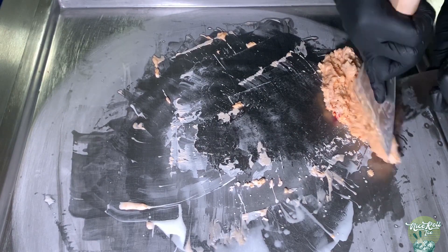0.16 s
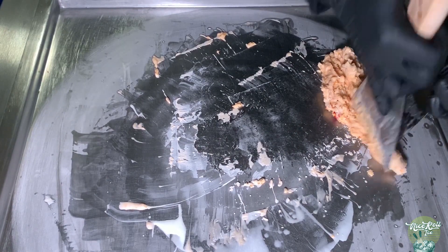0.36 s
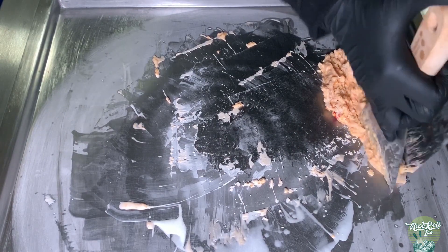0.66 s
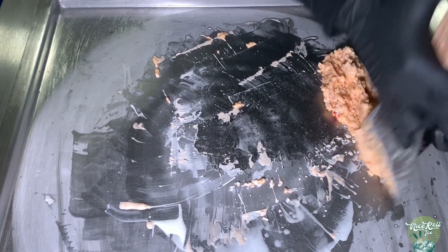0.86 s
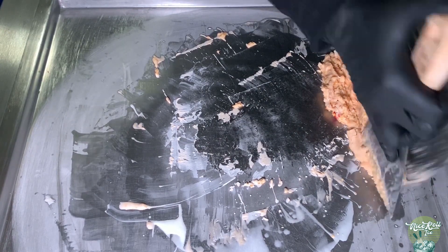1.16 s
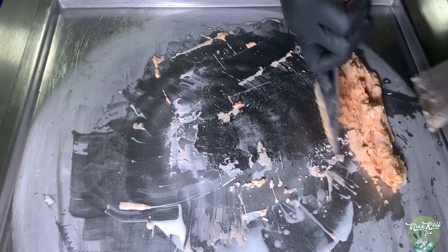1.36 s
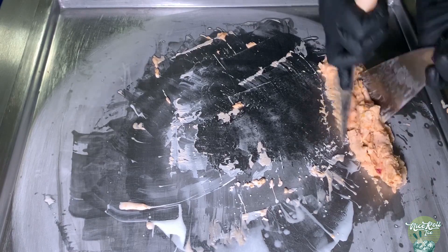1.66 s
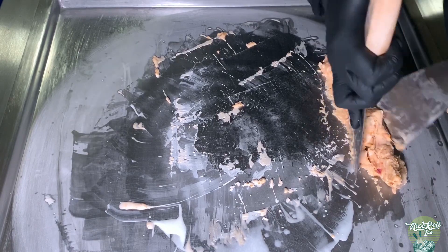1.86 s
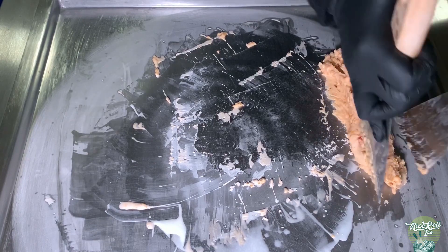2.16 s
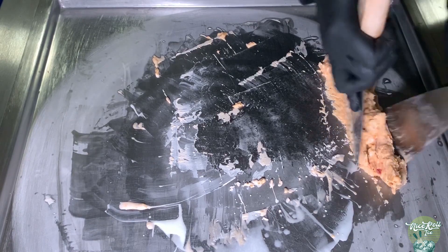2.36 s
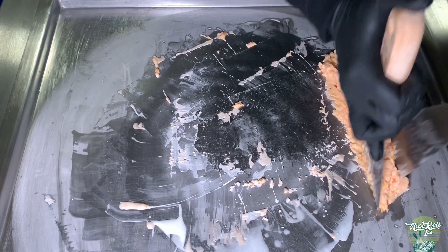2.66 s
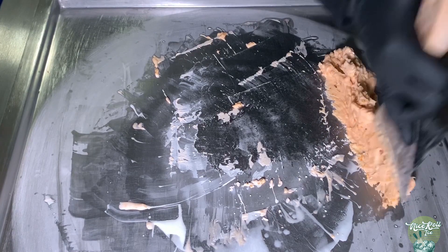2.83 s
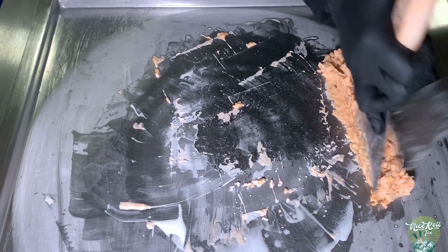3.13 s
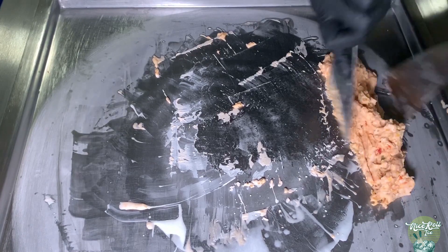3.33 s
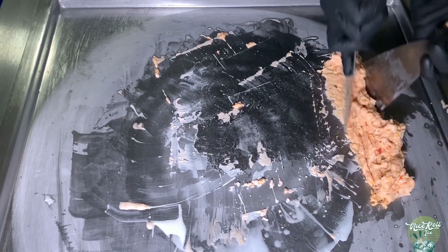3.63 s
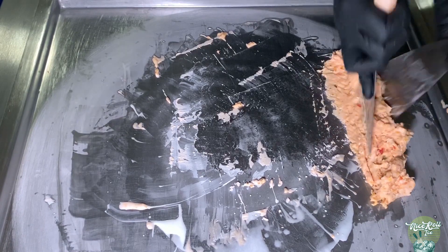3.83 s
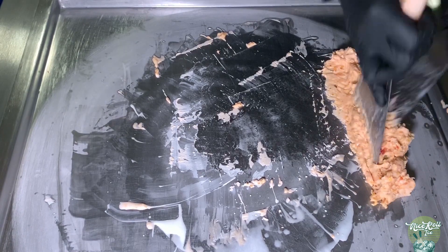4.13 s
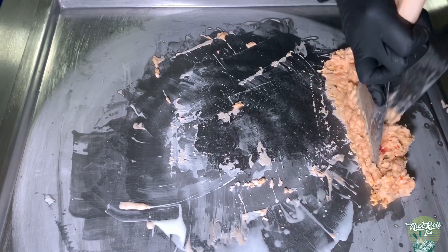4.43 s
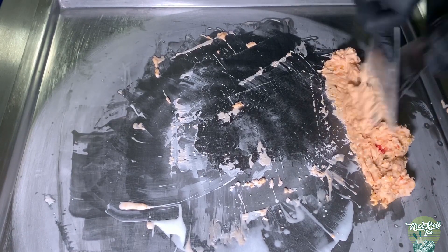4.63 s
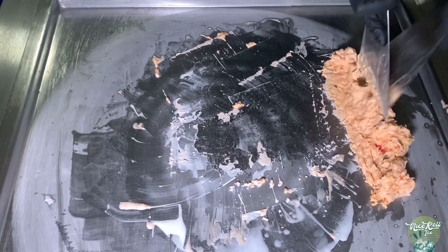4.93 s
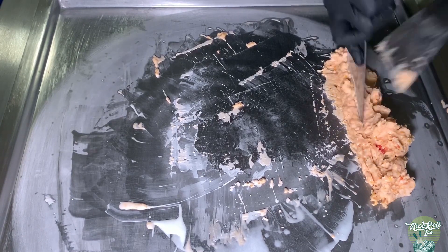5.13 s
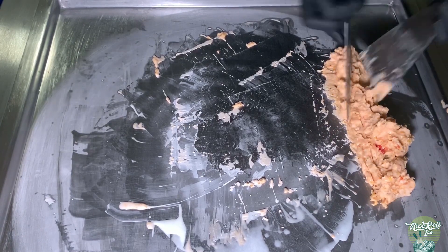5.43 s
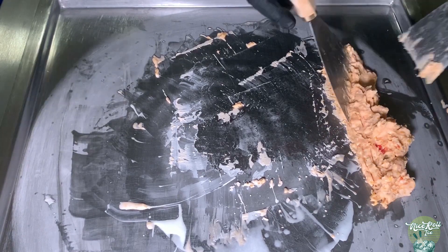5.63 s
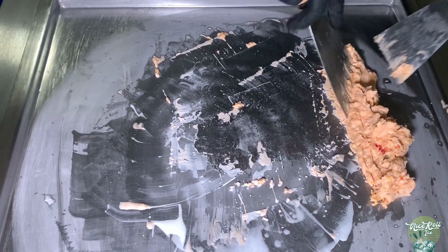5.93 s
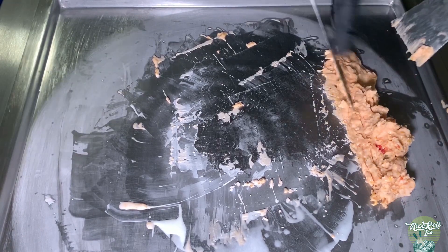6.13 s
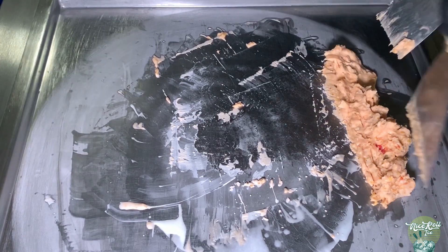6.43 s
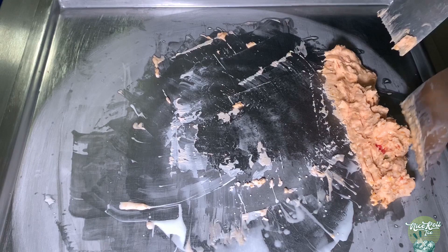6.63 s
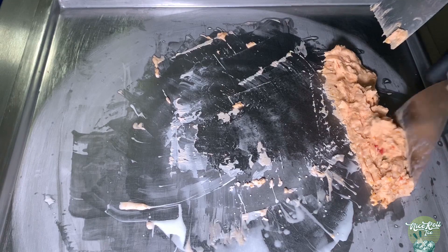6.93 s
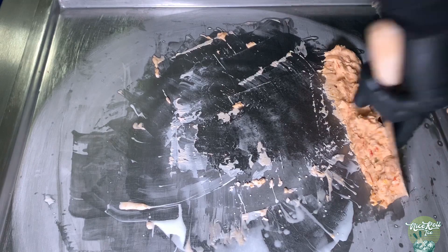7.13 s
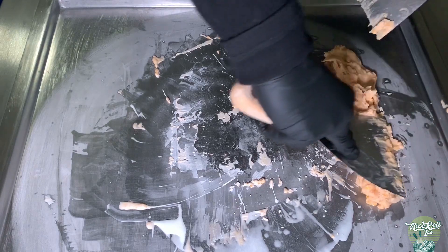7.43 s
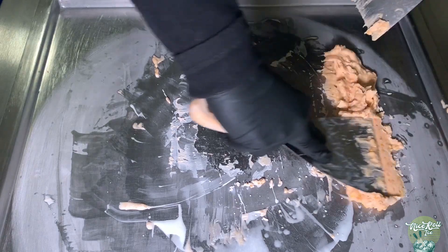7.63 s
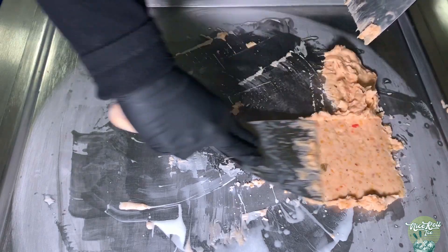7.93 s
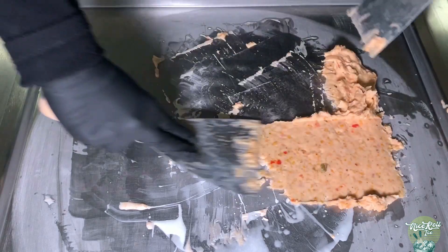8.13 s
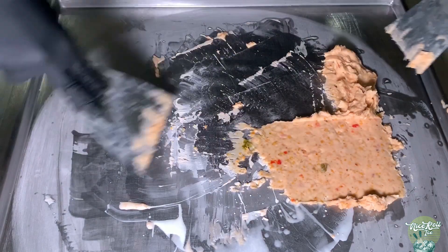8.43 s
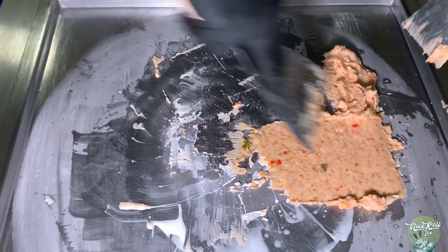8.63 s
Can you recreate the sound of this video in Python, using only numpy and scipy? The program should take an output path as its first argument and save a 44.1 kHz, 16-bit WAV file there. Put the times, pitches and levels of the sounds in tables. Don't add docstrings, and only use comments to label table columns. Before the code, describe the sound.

Two steel spatulas chop hard and clatter on a chilled metal plate, with gritty scrapes and squeaks over a steady low compressor hum.

```python
import sys
import numpy as np
from scipy import signal
from scipy.fft import rfft, irfft
from scipy.io import wavfile
from scipy.ndimage import uniform_filter1d

SR = 44100
rng = np.random.default_rng(int(sys.argv[2]) if len(sys.argv) > 2 else 0)


def dump(signal):
    limited = np.clip(np.atleast_2d(signal).T, -1, 1)
    pcm = np.round(limited * 32767).astype(np.int16)
    wavfile.write(sys.argv[1], SR, pcm)


def decibels_to_gain(level_db):
    exponent = np.asarray(level_db, float) / 20
    return 10 ** exponent


N = 387198

# f/Hz, width/Hz, level/dB
PLATE = [(387, 100, -37.5), (610, 38.5, 7), (706.5, 85, 2.5), (916, 29, 3.5), (1023, 33, 1.5),
         (1157, 26, -23)]
BLADE = [(1400, 660, -58), (1520, 17, -5.5), (1878, 160, 4.5), (2120, 386, 7.5), (2400, 330, 1),
         (2682, 63, 5.5), (3136, 34, -3), (3840, 220, -17.5)]
EDGE = [(5060, 1100, -3.5), (6320, 450, 7), (8310, 960, 10), (10000, 3800, 7), (11200, 760, -10),
        (11560, 400, -3), (14000, 5700, -0.5)]


def rms_one(x):
    return x / np.sqrt(np.mean(x ** 2) + 1e-20)


def at_hz(points, hz):
    f, value = np.array(points)[:, :2].T
    return np.interp(np.log(hz + 1e-9), np.log(f), value)


def drift(rate):
    step = 40
    r = np.exp(-2 * np.pi * step * rate / SR)
    coarse = rng.standard_normal(N // step + 4002)
    slow = signal.lfilter([1], [1, -2 * r, r * r], coarse)[4000:]
    return np.interp(np.arange(N) / step, np.arange(len(slow)), rms_one(slow))


def hum():
    # shaft order, mains order, level/dB rms, wobble/dB, left-right/dB, right lead/rad
    compressor = [(1, 0, -36, .8, .4, 0), (2, 0, -41.5, 1.5, -2, .35), (0, 2, -29, .6, -2.3, .35),
                  (3, 0, -42.5, 3, -1, .35), (1, 2, -43.5, 2, -1, .35), (5, 0, -47.5, 3, -.4, .3),
                  (1, 4, -47.5, 2, -.4, .3), (6, 0, -49.5, 4, 0, .3), (8, 0, -53.5, 3, 0, .3)]
    # f/Hz, level/dB rms
    blade_tones = [(112.45, -46), (224.9, -45.5)]
    shaft_hz, mains_hz = 49.172, 50
    t = np.arange(N) / SR - 0.14
    out = np.zeros((2, N))
    wobble = [drift(2.37) for k in range(4)]
    for k, (shaft, mains, level_db, wobble_db, pan_db, lead) in enumerate(compressor):
        phase = 2 * np.pi * (shaft * shaft_hz + mains * mains_hz) * t + [[0], [lead]]
        pan = decibels_to_gain(np.array([[pan_db / 2], [-pan_db / 2]]))
        out += decibels_to_gain(level_db + wobble_db * wobble[k % 4]) * np.sin(phase) * pan
    for hz, level_db in blade_tones:
        out += decibels_to_gain(level_db + 1.5 * wobble[0]) * np.sin(2 * np.pi * hz * t)
    return np.sqrt(2) * out


def airflow():
    # f/Hz, level/dB per Hz
    casing = [(30, -87), (60, -64), (85, -69), (115, -58.5), (137, -50.5), (190, -63), (290, -66.5),
              (420, -66.5), (480, -73.5), (610, -66), (760, -76), (890, -69.5), (1100, -75)]
    ducts = [(1100, -75), (2000, -80), (3500, -87.5), (5000, -91.5), (7400, -96), (8500, -93),
             (10500, -102.5), (12000, -90), (13200, -102), (15500, -104)]
    hz = np.fft.rfftfreq(N, 1 / SR)
    meet_hz = casing[-1][0]
    low, high = rfft(rng.standard_normal((2, 2, N))) * np.sqrt(SR / 2)
    rumble = irfft(low * decibels_to_gain(at_hz(casing, hz)) * (hz < meet_hz) * (hz > 20), N)
    hiss = irfft(high * decibels_to_gain(at_hz(ducts, hz)) * (hz >= meet_hz), N)
    return rumble * decibels_to_gain(1.2 * drift(3)) + hiss * decibels_to_gain(0.4 * drift(4))


def grit(spread_db):
    white = rng.standard_normal((2, N))
    sizes = decibels_to_gain(spread_db * np.minimum(rng.exponential(1, N), 4))
    streams = np.array([np.roll(white, k * 5000, axis=1) for k in range(3)])
    return rms_one(streams * sizes)


def body(force, modes, broad_db, strengths_db, damping):
    low, high = modes[0][0] * 0.61, modes[-1][0] * 0.95
    band = signal.butter(2, [low, high], "band", fs=SR, output="sos")
    out = decibels_to_gain(broad_db) * signal.sosfilt(band, force)
    power = decibels_to_gain(2 * broad_db) * 2 * (high - low) / SR
    for k, (hz, width, level_db) in enumerate(modes):
        r = np.exp(-np.pi * width * damping / SR)
        poles = [1, -2 * r * np.cos(2 * np.pi * hz / SR), r * r]
        struck = force * decibels_to_gain(level_db + strengths_db[k])
        out += (-1) ** k * (1 - r * r) / 2 * signal.lfilter([1, 0, -1], poles, struck)
        power += decibels_to_gain(2 * level_db) * np.pi * width * damping / SR
    return out / np.sqrt(power)


def all_blows():
    chops = [(0.3414, -25.5, 8, -9, 1750), (0.4395, -19, -5.5, -11, 2120), (0.5266, -15.5, 3, -13, 2550),
             (0.5719, -7.5, -4, -10, 2120), (0.7101, -10, -4, -11.5, 2120),
             (0.8777, -18.5, 4.5, -11.5, 1810), (0.9429, -5, -7, -14, 2770),
             (1.0404, -6.5, -1.5, -12.5, 2400), (1.1625, -24.5, -2.5, -14, 2630),
             (1.4948, -11.5, -2.5, -31, 2720), (1.502, -8.5, -16, -11, 1730),
             (2.4106, -14.5, 4, -13.5, 1940), (2.729, -21, -2, -14, 2430), (3.4146, -11.5, -6, -17, 2830),
             (3.4401, -7, -12, -8, 3130)]
    cuts = [
        (4.0684, -12.5, 0, -16, 1730),
        (4.7682, -6, -2, -7, 1680),
        (5.023, -9.5, 0, -13, 2480),
        (5.3836, -15, 2.5, -10, 2540),
    ]
    catches = [(1.674, -27.5, 6.5, -1.5, 1820), (2.078, -38.5, -6, -10, 1310),
               (2.4582, -25.5, -18, -4, 1670), (2.4965, -22.5, 2.5, -7, 2100), (2.517, -27, -2, -12, 1750),
               (3.4513, -13.5, -16, -9, 1850), (3.5125, -43, -13, -9, 1880), (3.5354, -36, -8, 1, 1890),
               (3.646, -29.5, 1, -12, 1560), (4.44, -43, 1.5, -16, 1900), (4.603, -37, 2.5, -15, 1890),
               (8.1782, -29, -28, -7, 3350), (8.1875, -24.5, -25, -13, 2120), (8.219, -36, -29, 11, 2180),
               (8.254, -19.5, -29, -5, 2260), (8.2802, -17, -31, -0.5, 3300)]
    # t/s, blade peak/dB, edge tick/dB re peak
    edge_ticks = [(0.834, -43, 5), (0.8596, -36, 4), (2.8826, -36.5, 9), (2.891, -33, 12),
                  (3.031, -49.5, 10), (3.071, -47, 5), (3.0998, -30.5, 9.5), (3.114, -35.5, 12),
                  (5.5444, -44, 16.5), (8.11, -58, 9), (8.347, -44, 8), (8.426, -52, 10)]
    ticks = [(s, peak_db, -10, tick_db, 4200) for s, peak_db, tick_db in edge_ticks]
    # plate, blade, edge ring/dB re peak, prominence of loudest pitch/dB, edge brightening/dB per mode
    kinds = [(chops, (-6, -2, -0.5, 5.5, 0)),
             (cuts, (-8, -2, -2, 6.5, -0.5)),
             (catches, (-17, -33, -10, 7.5, 0)),
             (ticks, (-5, -4.5, -2, 10, 1.5))]
    return [(*row, *traits) for rows, traits in kinds for row in rows]


def blows():
    contact_s = [0.0076, 0.006, 0.0031]
    ring_t60_s = [0.33, 0.2, 0.091]
    knock, ring, rough = np.zeros((2, N)), np.zeros((3, N)), grit(3.5)
    early, t = SR // 50, np.arange(SR // 2) / SR
    near = np.arange(-early, 3 * early) / SR
    after = np.maximum(near, 0)

    approach = decibels_to_gain([[-26], [-23], [-30]]) * np.exp(near / 0.005) * (near < 0)
    rise = 1 - np.exp(-after / np.array([[0.0015], [0.0004], [0.0002]]))
    crack = 1 + 1.3 * np.exp(-after / 0.0015)
    rattle = np.exp(-(after / np.array(contact_s)[:, None]) ** 2)
    shape = approach + rise * crack * rattle
    decay_db = -60 * t / np.array(ring_t60_s)[:, None]
    onset = 1 - np.exp(-t / 0.0011)

    events = all_blows()
    luck = 1.8 * rng.standard_normal((len(events), 3, 9))
    for (s, peak_db, thud_db, tick_db, hz, *ring_db, pitch_db, bright_db), spot in zip(events, luck):
        i = round(s * SR)
        span = slice(i - early, i + 3 * early)
        level = decibels_to_gain(peak_db + np.array([[thud_db - 3.5], [-6], [tick_db - 3]]))
        sizes = np.sqrt(np.mean((level * shape) ** 2, axis=1))
        force = shape[:, None] * rough[:, :, span] + 1e-18
        blade = BLADE[:1] + [(hz, 150, pitch_db)] + BLADE[1:]
        strengths = spot + bright_db * np.outer([0, 0, 1], np.arange(9))
        for k, (modes, damping) in enumerate([(PLATE, 2.5), (blade, 2.2), (EDGE, 1.2)]):
            knock[:, span] += sizes[k] * rms_one(body(force[k], modes, -7.5, strengths[k], damping))
        tail = decibels_to_gain(np.array(ring_db)[:, None] + decay_db) * onset
        ring[:, i:i + len(t)] += (level * tail)[:, :N - i]
    return knock, ring


def thumps():
    # t/s, peak level/dB, f/Hz, t60/s
    bends = [(0.526, -27, 143, 0.098), (0.573, -14.5, 131, 0.31), (0.708, -16, 132, 0.11),
             (0.879, -17, 145, 0.048), (0.941, -20, 239, 0.1), (1.041, -15.5, 133, 0.34),
             (1.163, -26, 121, 0.065), (1.506, -10, 133, 0.083), (2.411, -20, 122, 0.091),
             (2.727, -25, 145, 0.17), (3.417, -14.5, 122, 0.054), (3.441, -12.5, 141, 0.056),
             (4.069, -23, 121, 0.08), (4.768, -3, 371, 0.039), (4.769, -13, 253, 0.11),
             (5.022, -24, 124, 0.2), (5.024, -14, 306, 0.039), (5.383, -14, 125, 0.082)]
    out, t = np.zeros(N), np.arange(SR // 4) / SR
    for s, peak_db, hz, t60 in bends:
        i = round(s * SR)
        swing = (1 - np.exp(-t / 0.0016)) * np.sin(2 * np.pi * hz * t)
        out[i:i + len(t)] += decibels_to_gain(peak_db - 60 * t / t60) * swing
    return out


def squeaks():
    # t/s, length/s, f/Hz, width/Hz, level/dB
    slips = [(0.57, .03, 8000, 200, -38), (1.489, 0.038, 2690, 90, -21), (1.51, 0.022, 8540, 150, -28),
             (1.533, 0.13, 683, 60, -26.5), (1.541, 0.056, 2640, 80, -29.5),
             (1.623, 0.075, 1650, 120, -34.5), (2.495, 0.063, 1702, 570, -30),
             (2.509, .065, 1018, 160, -28.5), (2.533, 0.072, 617, 90, -35), (3.44, 0.03, 8100, 150, -32),
             (3.499, 0.13, 1894, 60, -44), (3.51, 0.016, 8620, 160, -33.5), (3.529, .065, 890, 45, -29.5),
             (3.55, .034, 2620, 200, -38), (3.577, 0.048, 893, 40, -36), (3.632, 0.042, 1496, 470, -29),
             (8.176, .165, 2180, 120, -34), (8.175, 0.16, 3320, 110, -43), (8.25, 0.16, 1450, 230, -40),
             (8.297, .1, 2040, 130, -45), (8.355, .045, 1422, 60, -29.5)]
    out = np.zeros((2, N))
    for s, length, hz, width, level_db in slips:
        n, i = round(length * SR), round(s * SR)
        chance = rng.standard_normal((2, 2, 10000))
        wander = chance[0] + 1j * chance[1]
        for pole_width in width, 2 * width:
            wander = signal.lfilter([1], [1, -np.exp(-np.pi * pole_width / SR)], wander)
        wander = wander[:, -n:]
        wander = wander / np.sqrt(np.mean(abs(wander) ** 2))
        tone = (0.66 + wander) * np.exp(2j * np.pi * hz * np.arange(n) / SR)
        out[:, i:i + n] += decibels_to_gain(level_db) * signal.windows.tukey(n, 0.45) * tone.real
    return out * decibels_to_gain(1.5 * drift(80))


def strokes():
    drags = [(1.508, 0.32, -21, -23, -28), (1.635, 0.21, -27, -39, -60), (2.496, 0.16, -27, -25.5, -32),
             (2.917, 0.16, -50, -60, -43), (3.117, 0.11, -44, -48, -43), (3.452, 0.051, -36, -56, -29),
             (3.651, 0.15, -24, -32, -43), (4.595, .05, -33, -44, -42), (5.564, 0.21, -56, -58, -45),
             (6.94, 0.066, -62, -44, -36), (8.293, 0.21, -53, -28, -33.5)]
    sweeps = [(0.773, 0.13, -48, -50, -39.5), (0.896, 0.083, -43, -37.5, -29.5),
              (1.092, 0.086, -60, -38, -28.5), (2.05, 0.063, -45, -54, -49.5), (2.395, 0.11, -35, -33, -47),
              (3.52, 0.082, -36, -43, -45), (3.589, 0.1, -30, -40, -46.5), (4.4, .07, -54, -49, -49),
              (5.605, 0.41, -65, -62, -49.5), (6.887, 0.088, -61, -54, -50), (8.084, 0.057, -62, -55, -54),
              (8.166, 0.17, -60, -30, -38), (8.313, 0.14, -38.5, -38.5, -38.5)]
    bite_s, ease_db, swell_share = 0.0032, 31, 0.85
    out = np.zeros((3, N))
    for rows in drags, sweeps:
        for s, length, *levels_db in rows:
            i, t = round(s * SR), np.arange(round(length * SR)) / SR
            if rows is drags:
                bite = np.clip(np.minimum(t, length - t) / bite_s, 0, 1)
                pressure = bite * decibels_to_gain(-ease_db * t / length)
            else:
                pressure = signal.windows.tukey(len(t), swell_share)
            out[:, i:i + len(t)] += decibels_to_gain(np.array(levels_db))[:, None] * pressure
    return out * decibels_to_gain(1.5 * drift(40) + 2.2 * drift(140))


def spatulas():
    knock, ring = blows()
    force = (ring + strokes())[:, None] * grit(2.0) + 1e-18
    wander = [1.6 * drift(10) for k in range(8)]   # dB, as the contact point moves
    plate = body(force[0], PLATE, -3, wander, damping=0.45)
    blade = body(force[1], BLADE, -2.5, wander[::-1], damping=0.3)
    edge = body(force[2], EDGE, -15, wander, damping=1.0)
    return knock, plate + blade + edge


def ports(pair, least):
    # f/Hz, share in common
    likeness = [(40, 1), (130, 0.97), (300, 0.85), (520, 0.022), (2500, 0.043), (5200, 0.022), (7200, 0.77),
                (9300, 0.65), (11600, 1), (14000, 1), (16000, 0.73)]
    in_step_hz, turn_hz = 9400, 4550
    hz = np.fft.rfftfreq(N, 1 / SR)
    left, other = rfft(pair)
    alike = np.clip(at_hz(likeness, hz), least, 1)
    lead = 2 * np.pi * np.maximum((hz - in_step_hz) / turn_hz, -1)
    right = alike * left * np.exp(1j * lead) + np.sqrt(1 - alike ** 2) * other
    return irfft([left, right], N)


def scene():
    drone, air = hum(), airflow()
    knock, diffuse = spatulas()
    direct = ports(decibels_to_gain(2.5) * (knock + squeaks()), least=0.5)
    return direct + ports(diffuse + air, least=0) + drone + thumps()


def top_cut(x):
    return signal.sosfilt(signal.butter(12, 20000, fs=SR, output="sos"), x)


def record(dry):
    level_db = 10 * np.log10(uniform_filter1d(np.mean(dry ** 2, axis=0), size=256) + 1e-12)
    release_db = 45 * np.arange(N) / SR
    held_db = np.maximum.accumulate(level_db + release_db) - release_db
    excess_db = uniform_filter1d(np.maximum(held_db + 17, 0), size=128)
    ducked = dry * decibels_to_gain(-0.3 * excess_db)
    rounded = 0.95 * np.tanh(ducked / 0.95)
    low_pass = signal.cheby2(10, 50, 16750, fs=SR, output="sos")
    mix = signal.sosfilt(low_pass, rounded)
    return top_cut(mix)


dry = scene()
out = record(dry)
dump(out)
```